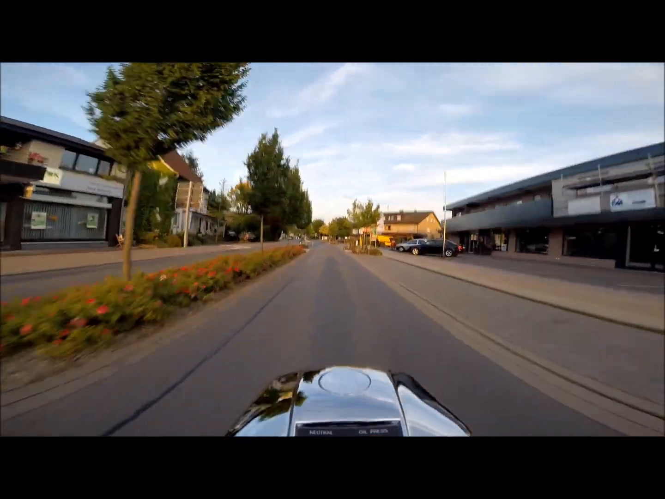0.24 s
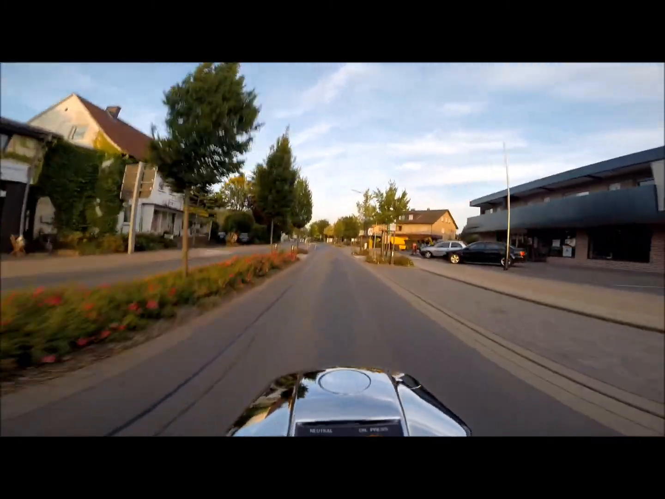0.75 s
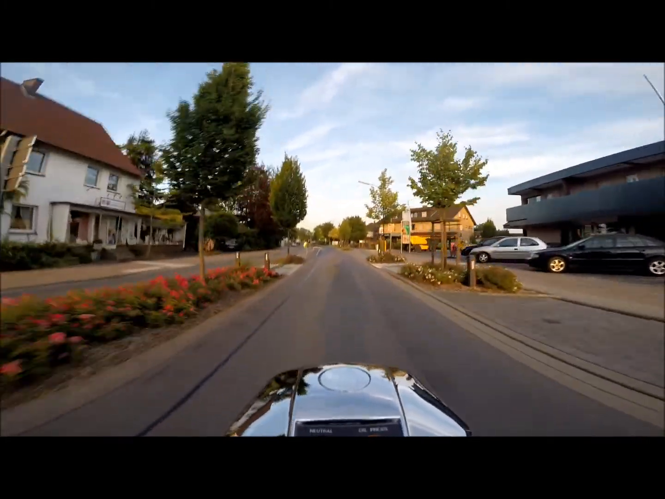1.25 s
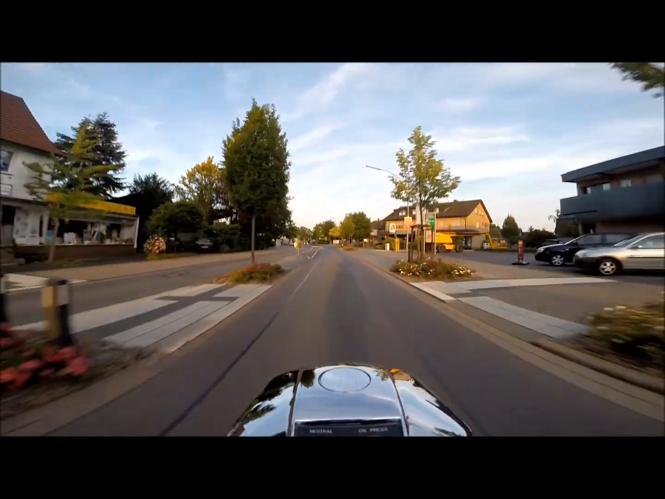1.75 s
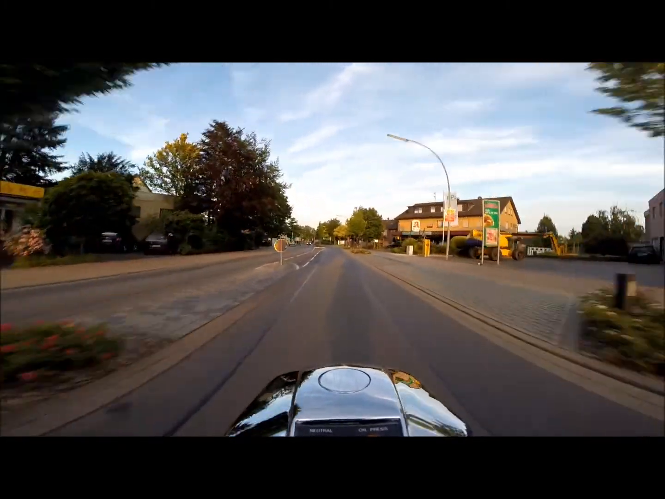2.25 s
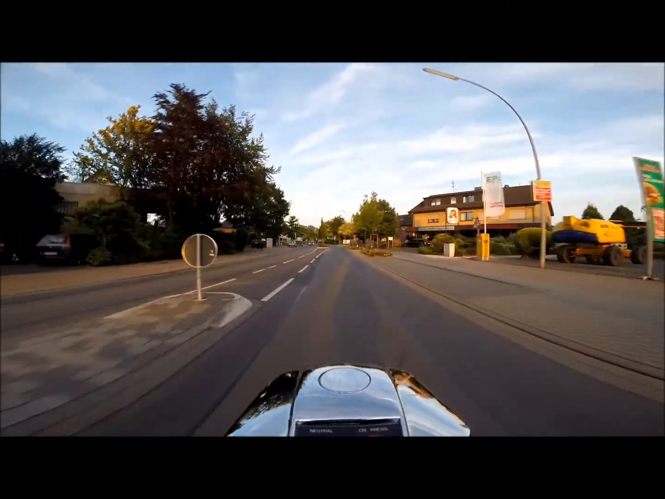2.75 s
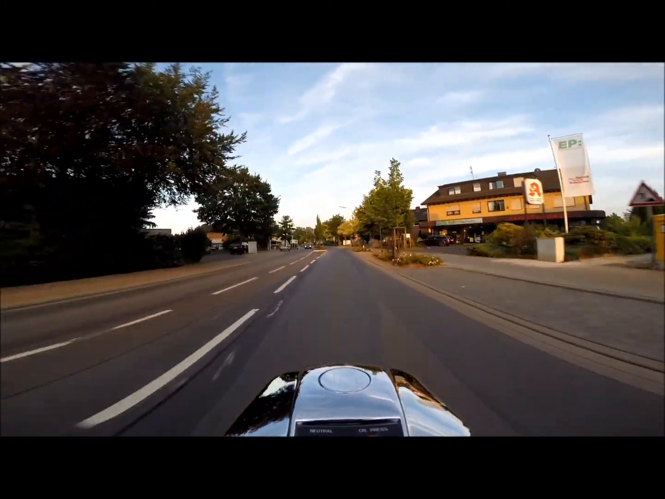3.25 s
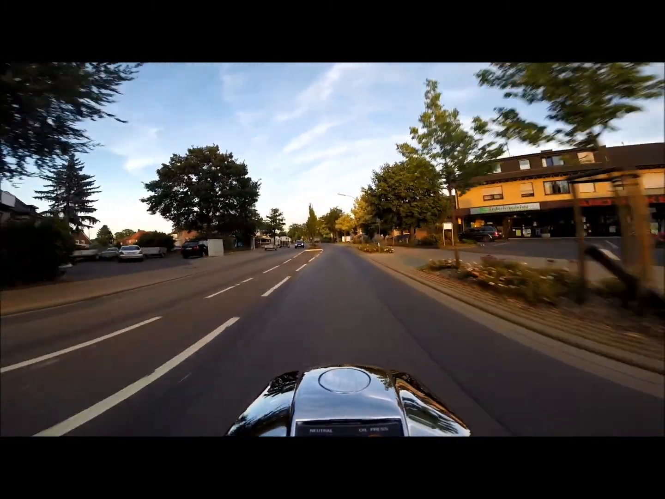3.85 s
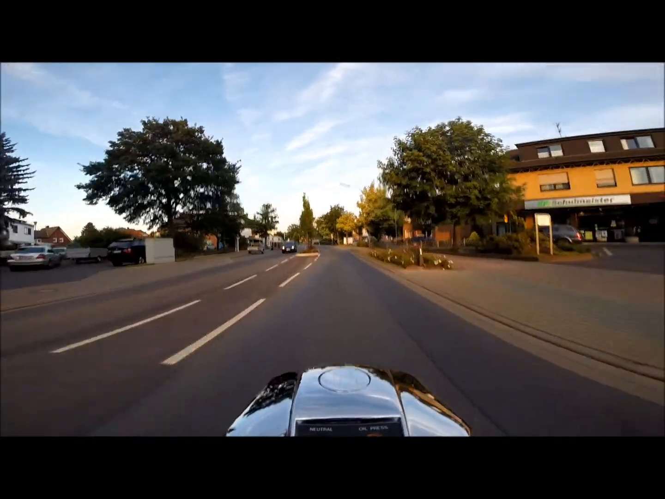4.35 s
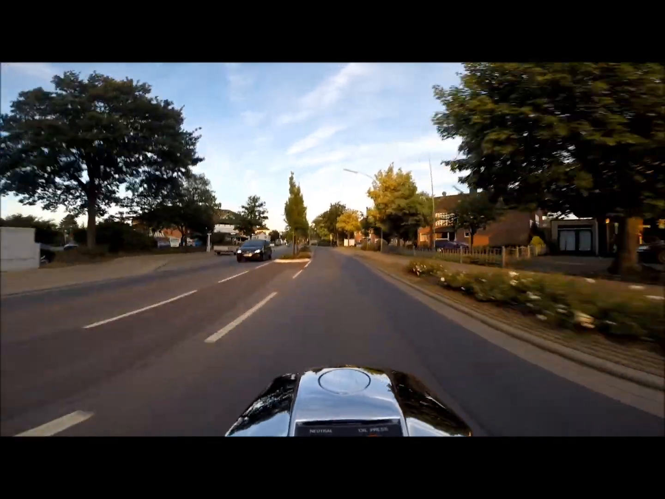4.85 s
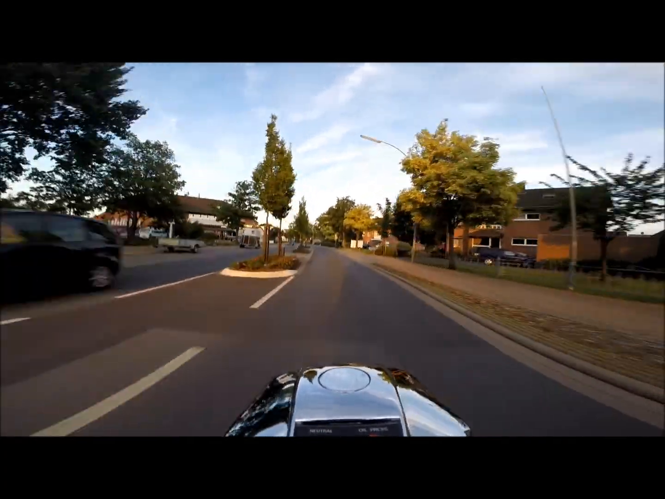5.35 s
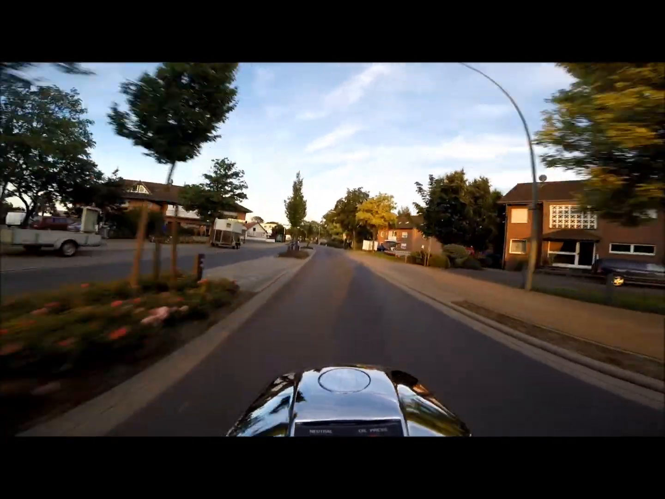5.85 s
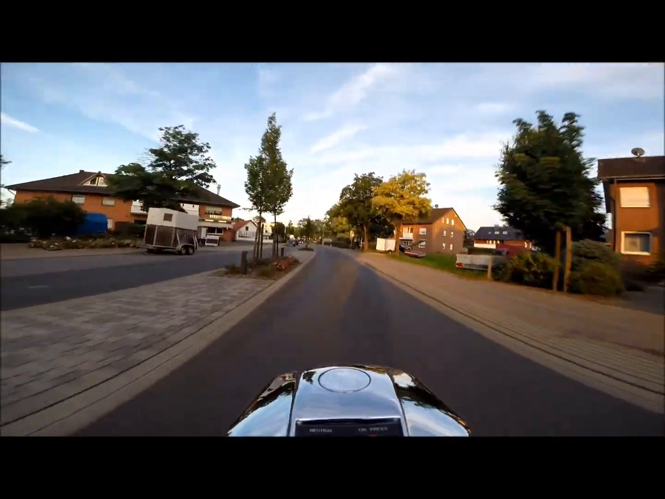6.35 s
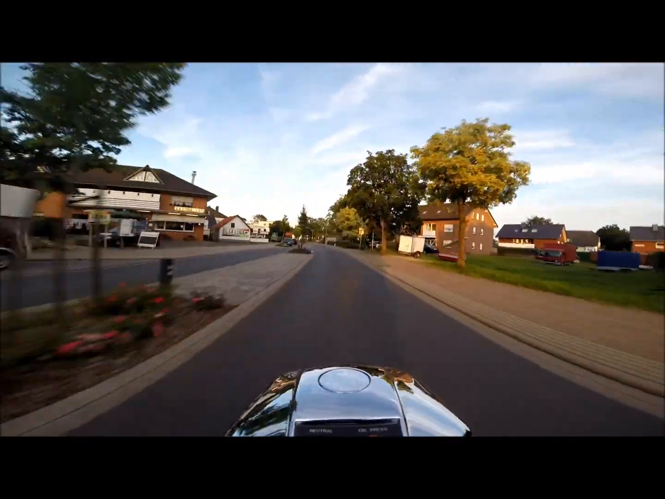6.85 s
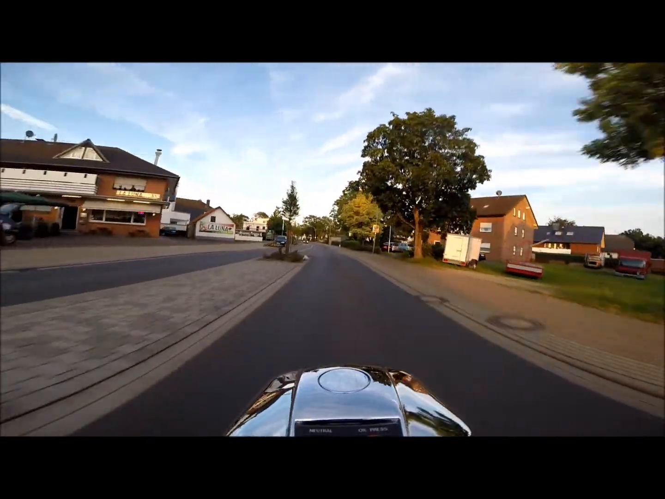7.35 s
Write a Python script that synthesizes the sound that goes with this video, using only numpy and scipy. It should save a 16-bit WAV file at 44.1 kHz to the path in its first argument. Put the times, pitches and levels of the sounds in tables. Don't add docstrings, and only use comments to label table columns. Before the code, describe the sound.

Close on a V-twin motorcycle, the engine pulls up with a buzzing, knocking rattle, sags at a gear change, then settles into a slowly climbing cruise.

```python
import sys
import numpy as np
from scipy import signal
from scipy.fft import rfft, irfft
from scipy.io import wavfile
from scipy.ndimage import uniform_filter1d

SR = 44100
rng = np.random.default_rng(int(sys.argv[2]) if len(sys.argv) > 2 else 0)


def wrap_up_sound(samples):
    columns = np.atleast_2d(samples).T
    tamed = np.clip(columns, -1, 1)
    steps = np.round(tamed * 32767).astype(np.int16)
    wavfile.write(sys.argv[1], SR, steps)


def how_loud(loudness_db):
    steps = np.asarray(loudness_db, float) / 20
    return 10 ** steps


N = 335601
T = np.arange(N) / SR

# start_s, cycle_hz
SPEED = [(0.0, 21.43), (0.2, 19.53), (0.55, 19.72), (1.3, 20.92), (2.2, 23.49), (3.0, 25.51), (3.73, 27.27),
         (3.82, 26.77), (3.94, 24.85), (4.26, 22.03), (4.38, 20.66), (4.48, 20.32), (4.7, 20.68),
         (5.3, 21.62), (5.7, 22.15), (6.4, 22.58), (7.1, 22.91), (7.61, 23.28)]
# multiple, level_db under load at 22 Hz, slope_db_per_hz of speed
WEAK_ORDERS = [(1, -38, 1.0), (3, -28, -1.0), (5, -30, -.8), (6, -34, .1), (8, -40, 1.5), (10, -38, -2.5),
               (11, -37, -3.0), (12, -44, -2.5), (15, -44, 2.5), (17, -40, -1.2), (19, -40, -2.5)]
# cycle_hz, order2_db, order4_db, order7_db, order9_db
MOUNT_LOW_GEAR = [(19.6, -10.5, -30, -52, -46), (20.3, -9.7, -41, -50, -37), (21.1, -12, -27, -41, -31),
                  (22.5, -17, -25, -33, -22.5), (23.7, -20, -20.5, -29, -29), (25.4, -20, -19.5, -30, -48),
                  (26.2, -18, -19.5, -30, -34), (27.3, -15.5, -21, -32, -39)]
MOUNT_HIGH_GEAR = [(20.3, -12.5, -29, -44, -32), (20.7, -13, -31, -36, -23), (21.6, -15, -27, -36, -24.5),
                   (22.6, -16.3, -25.5, -35, -24), (22.9, -18, -24, -36, -32), (23.3, -19.5, -22, -41, -38)]
SHUT_DB = [-0.9, 2.5, -24, -6, -5]
# start_s, vibration_db, looseness_db
SHAKE = [(0.05, -24, -42), (.22, -29.5, -47), (.63, -31.5, -42), (.69, -27, -27.5), (1.3, -26.5, -26),
         (1.8, -23, -25), (2.3, -18.5, -31), (2.65, -21.5, -32.5), (3.1, -22.5, -28), (3.6, -20.5, -23.5),
         (3.82, -23.5, -29), (3.93, -19.5, -38), (4.17, -21, -36), (4.48, -28, -33.5), (4.75, -23.5, -23),
         (5.4, -24.5, -26), (6.4, -20.5, -27), (7.61, -20, -29.5)]
# start_s, main_swing_db, other_swing_db
STOP_PULLING = [(.22, -40, -40), (.28, -12.5, -19), (.45, -12.5, -32), (.58, -18, -16), (.7, -12, -24),
                (.85, -8, -34), (1.22, -10, -30), (1.33, -15, -13), (1.45, -22, -34)]
STOP_AFTER_SHIFT = [(4.45, -30, -35), (4.5, -12, -11), (4.6, -9.5, -13.5), (4.9, -13, -16),
                    (5.15, -16.5, -10), (5.3, -18, -18.5), (5.45, -13.5, -20), (5.55, -32, -40)]
# start_s, peak_db
SNAPS = [(0.671, -24), (1.3374, -25), (1.4345, -27), (1.448, -25), (1.503, -29), (1.517, -22),
         (1.562, -22.5), (1.7494, -26), (1.889, -21), (2.0445, -17), (2.1121, -21), (2.24, -21.5),
         (2.449, -22.5), (3.2696, -20), (3.3777, -26), (3.491, -31), (3.619, -18), (3.7342, -20.5),
         (3.844, -17.5), (4.2274, -28), (5.2934, -21.5), (5.685, -24), (5.7548, -22), (6.27, -25),
         (6.424, -19.5), (6.4763, -18), (6.644, -17.5), (6.96, -18.5), (7.2228, -20), (7.5547, -26)]
# pitch_hz, level_db
RUMBLE = [(10, -25), (16, -11), (26, -7), (35, 0), (41, -4), (46, -9), (60, -9), (72, -15), (95, -15),
          (122, -11), (150, -21), (300, -40)]
# pitch_hz, width_hz, level_db
PIPE = [(144, 61, -5.5), (209.4, 43, -7.5), (394.3, 89.5, -2)]
FRAME = [(107.4, 59, -1), (207, 41, 6), (300, 34, -5), (384, 68.6, 3), (461, 20, -4)]
HOUSING = [(760, 560, -25), (1046, 200, -5), (1183, 38, -5.5), (1431, 280, -3), (1645, 93, -13.5),
           (1959, 259, 2), (2363, 300, -4.5), (2638, 75, -8.5), (3034, 500, -18), (3520, 440, -20.5)]
SHELL = [(4440, 850, -12.5), (4780, 110, -4), (5010, 200, -15), (5440, 265, 2.5), (5770, 380, -2.5),
         (6260, 980, -2), (7460, 370, -8), (7760, 550, -17.5), (8440, 550, -19), (9220, 570, -14.5),
         (10320, 400, -24.5), (10850, 390, -26), (11400, 340, -34.5), (12900, 500, -42), (13700, 900, -60)]
CLAMP = [(3566, 230, 1), (2870, 980, 1.5), (4600, 3000, -12.5)]
KNOCK = [(314, 56, 0.5), (430, 210, -4), (626, 700, -2.5), (1070, 160, -32)]

SHUT_S, OPEN_S, WRIST_S = 3.8, 4.42, 0.13
SLACK_S, SLACK_WIDTH_S, SLACK_DB = 3.99, 0.091, -12
PULL_S, PULL_FROM_DB, EASE_DB_PER_HZ = 1.6, -5, -0.73
PIPE_TURN, PIPE_LEAD_PER_HZ = .25, .036
PIPE_SMEAR = .085
SWAY_HZ, SWAY_IN_STEP_S = 37.0, 1.92
SWAY_S, SWAY_WIDTH_S, SWAY_DB = 1.95, 0.29, -20
RUMBLE_DB, RUMBLE_DB_PER_HZ = -27, -0.4
FRAME_DB, FRAME_FOLLOW, FRAME_HIGH_GEAR_DB = -5, 1, -2.5
FIZZ_DB, FIZZ_FOLLOW = -16, 1.16
STRAY_PER_S, STRAY_DB, SNAP_BODY_DB = 8.3, 20, 7
WHINE_HZ, WHINE_WIDTH_HZ, WHINE_DB = 9210, 430, -68.5


def evened(x):
    return x / np.sqrt(np.mean(x ** 2) + 1e-20)


def curves(rows):
    s, *columns = np.transpose(rows)
    return [np.interp(T, s, column) for column in columns]


def causal(gain):
    log_gain = np.log(np.maximum(np.r_[gain, gain[-2:0:-1]], 1e-6))
    spectrum = np.exp(np.conj(signal.hilbert(log_gain)))
    taps = np.fft.ifft(spectrum).real[:len(gain)]
    return taps / np.linalg.norm(taps)


def body(x, modes, steep=2):
    hz = np.fft.rfftfreq(16384, 1 / SR)
    power = sum(how_loud(2 * db) / (1 + (2 * (hz - f) / w) ** 2) ** steep for f, w, db in modes)
    return signal.oaconvolve(x, causal(np.sqrt(power)))[:N]


def wander(hz):
    lowpass = signal.butter(2, hz, fs=SR, output="sos")
    return evened(signal.sosfilt(lowpass, rng.standard_normal(N)))


def strikes(turns, spread_db, jitter_s):
    at = np.flatnonzero(np.diff(np.floor(turns)) > 0)
    luck = rng.standard_normal((len(at), 2))
    late = (jitter_s * SR * luck[:, 0]).astype(int)
    out = np.zeros(N)
    np.add.at(out, np.clip(at + late, 0, N - 1), how_loud(spread_db * luck[:, 1]))
    return out


def burst(clicks, rise_s):
    u = np.arange(800) / SR / rise_s
    envelope = u ** 2 * np.exp(-2 * u)
    return signal.oaconvolve(clicks, envelope)[:N] * rng.standard_normal(N)


def rumble(hz):
    smooth_hz = uniform_filter1d(hz, SR, mode="nearest")
    level_db = RUMBLE_DB + RUMBLE_DB_PER_HZ * (smooth_hz - 22.5)
    bins = np.fft.rfftfreq(N, 1 / SR)
    f, db = np.transpose(RUMBLE)
    colour = how_loud(np.interp(np.log(bins + 1), np.log(f), db, right=-90))
    noise = irfft(rfft(rng.standard_normal(N)) * colour, N)
    return how_loud(level_db) * evened(noise)


def sway(turns):
    level_db = SWAY_DB - 8.7 * ((T - SWAY_S) / SWAY_WIDTH_S) ** 2
    in_step = 2 * turns[round(SWAY_IN_STEP_S * SR)]
    swing = np.cos(2 * np.pi * (SWAY_HZ * (T - SWAY_IN_STEP_S) + in_step))
    return how_loud(level_db) * evened(swing)


def pipe_note(front):
    firings = strikes(front + 0.1228, spread_db=1.5, jitter_s=0.00034)
    firings = firings + .5 * strikes(front - .44, spread_db=1.5, jitter_s=0.00027)
    return evened(body(firings, PIPE))


def frame_drone(front, noise):
    beat = np.cos(2 * np.pi * front)
    return evened(body(noise * how_loud(3.7 * beat + 0.81 * wander(hz=30.2)), FRAME))


def housing_ring(walls, hz):
    lid, base = body(walls[0], HOUSING[5:]), body(walls[1], HOUSING[:5])
    return evened(lid + how_loud(-3.5 + 0.28 * load(hz)) * base)


def shell_fizz(noise, throb, gusts):
    dull = signal.lfilter([1], [1, -1.3, .45], noise)
    return evened(body(dull * how_loud(.5 * throb + 1.55 * gusts), SHELL))


def loose_rattle(chatter, noise, gusts):
    bright = np.diff(chatter + 0.5 * noise * how_loud(2.3 * gusts), prepend=0)
    return evened(body(bright, SHELL)) + how_loud(7.5) * evened(body(bright, CLAMP, steep=2.52))


def buzz(turns, hz):
    shake_db, loose_db = curves(SHAKE)
    frame_db = FRAME_DB - 23.5 + FRAME_FOLLOW * (shake_db + 22.5) + FRAME_HIGH_GEAR_DB * (T > OPEN_S)
    fizz_db = FIZZ_DB - 23 + FIZZ_FOLLOW * (shake_db + 23)
    rattle_db = shake_db + loose_db + 1.8 * wander(hz=10)
    ring_db = shake_db + 0.44 * wander(hz=7.6)

    front = turns - .47 + 0.046 * (hz - 22.5)
    throb = np.cos(4 * np.pi * (turns - .15))
    gusts = wander(hz=64.6)
    hiss = rng.standard_normal((3, N))
    ticks = strikes(2 * turns, spread_db=3.0, jitter_s=0.0018)
    ticks = ticks + .5 * strikes(3.3 * turns, spread_db=5.5, jitter_s=.005)
    chatter = evened(burst(ticks, rise_s=0.0011))
    walls = [hiss[1] * how_loud(0.27 * throb + 1.77 * lumps) + 0.22 * chatter
             for lumps in (gusts, wander(hz=60.7))]

    out = how_loud(frame_db + 1.0) * frame_drone(front, hiss[0])
    out = out + how_loud(frame_db - 5.5) * pipe_note(front)
    out = out + how_loud(WHINE_DB) * evened(body(walls[0], [(WHINE_HZ, WHINE_WIDTH_HZ, 0)]))
    out = out + how_loud(ring_db - 0.06) * housing_ring(walls, hz)
    out = out + how_loud(fizz_db - 1.4) * shell_fizz(hiss[2], throb, gusts)
    return out + how_loud(rattle_db + 5.0) * loose_rattle(chatter, hiss[0], gusts)


def snaps():
    shake_db, loose_db = curves(SHAKE)
    stray_db = shake_db + loose_db + STRAY_DB + 4.3 * (rng.random(N) - .5)
    high = (rng.random(N) < STRAY_PER_S / SR) * how_loud(stray_db)
    for s, db in SNAPS:
        high[round(s * SR)] = how_loud(db)
    low = high * how_loud(SNAP_BODY_DB + 1.7 * rng.standard_normal(N))
    bright = np.diff(burst(high, rise_s=0.0018), prepend=0)
    shell = how_loud(15.0) * body(bright, SHELL) + how_loud(21.0) * body(bright, CLAMP, steep=2.44)
    return shell + how_loud(16.5) * body(burst(low, rise_s=0.00059), HOUSING)


def stop_blows(turns):
    swing = np.floor(2 * turns - .085)
    at = np.flatnonzero(np.diff(swing) > 0) + 1
    at = at + rng.integers(0, 50, len(at)) * (T[at] > OPEN_S)
    before, between, after = [(0, -60, -60)], [(1.6, -60, -60), (4.4, -60, -60)], [(5.7, -60, -60)]
    main_db, other_db = curves(before + STOP_PULLING + between + STOP_AFTER_SHIFT + after)
    force_db = np.where(swing % 2 == 1, main_db, other_db)[at]
    spread_db = np.where(T[at] > OPEN_S, 10, 5)
    blows = np.zeros(N)
    blows[at] = how_loud(force_db + spread_db * (rng.random(len(at)) - .5))
    return blows


def knock(turns):
    blows = stop_blows(turns)
    t = np.arange(600) / SR - .0045
    squeeze = np.exp(-(t / 0.0034) ** 2) * np.sin(2 * np.pi * 256 * t)
    push = signal.oaconvolve(blows, np.hanning(70))[:N]
    thud = how_loud(-2.5) * signal.oaconvolve(blows, squeeze)[:N] + how_loud(-25.0) * body(push, KNOCK)
    tick = np.roll(burst(blows, rise_s=0.00083), 90)
    return thud + how_loud(6.0) * body(tick, HOUSING) + how_loud(1.0) * body(tick, CLAMP, steep=2.3)


def shut():
    closing = np.clip((T - SHUT_S) / WRIST_S, 0, 1)
    return closing * np.clip((OPEN_S + WRIST_S - T) / WRIST_S, 0, 1)


def load(hz):
    pull_db = PULL_FROM_DB * np.clip(1 - T / PULL_S, 0, 1)
    return pull_db + EASE_DB_PER_HZ * np.maximum(hz - 23.5, 0) + SHUT_DB[4] * shut()


def mount(hz):
    low, high = np.transpose(MOUNT_LOW_GEAR), np.transpose(MOUNT_HIGH_GEAR)
    geared = np.clip((T - OPEN_S) / WRIST_S + 1, 0, 1)
    db = [(1 - geared) * np.interp(hz, low[0], a) + geared * np.interp(hz, high[0], b) + c * shut()
          for a, b, c in zip(low[1:], high[1:], SHUT_DB)]
    slack_db = SLACK_DB * np.exp(-((T - SLACK_S) / SLACK_WIDTH_S) ** 2)
    return [db[0] + slack_db] + db[1:]


def shake(turns, hz):
    load_db = load(hz)
    lines = list(zip((2, 4, 7, 9), mount(hz)))
    for k, db, slope in WEAK_ORDERS:
        speed_db = slope * np.maximum(hz - 22, -.5)
        lines.append((round(k), db + speed_db + load_db + 0.87 * wander(hz=2.9)))
    pulse = PIPE_TURN + PIPE_LEAD_PER_HZ * (hz - 22)
    out = np.zeros(N)
    for k, db in lines:
        lag = (k != 2) * .5 + (k > 2) * (k * pulse - PIPE_SMEAR * (k - 3) * (k - 4))
        out += np.sqrt(2) * how_loud(db) * np.cos(2 * np.pi * (k * turns + lag))
    return out


def scene():
    hz = curves(SPEED)[0]
    turns = np.cumsum(hz) / SR - .15
    background = rumble(hz) + sway(turns) + buzz(turns, hz)
    return (background + snaps() + knock(turns) + shake(turns, hz))[None]


def band_limit(x):
    return signal.sosfilt(signal.butter(12, 15170, fs=SR, output="sos"), x)


def record(dry):
    edge = signal.firwin(127, 14350, window=("kaiser", 8), fs=SR)
    limited = 1.202 * np.tanh(dry / 1.175)
    return band_limit(signal.oaconvolve(limited, edge[None], "same"))


dry = scene()
out = record(dry)
wrap_up_sound(out)
```